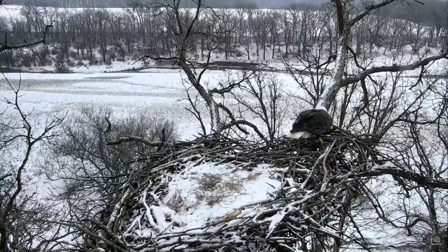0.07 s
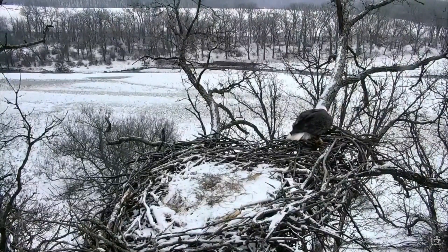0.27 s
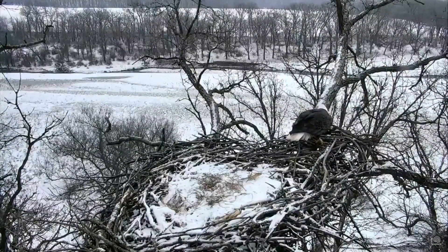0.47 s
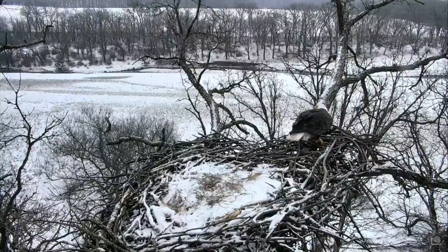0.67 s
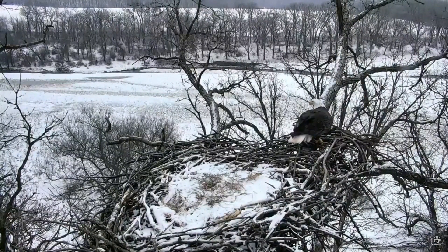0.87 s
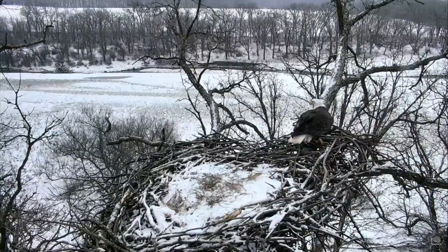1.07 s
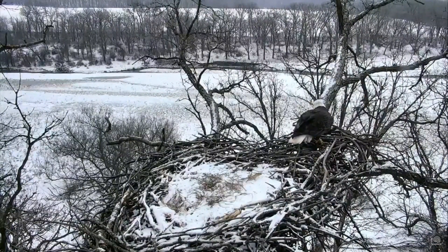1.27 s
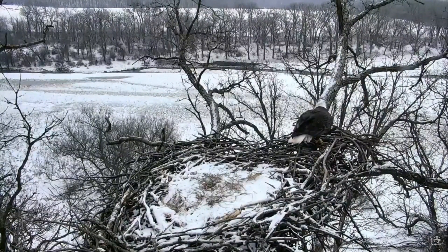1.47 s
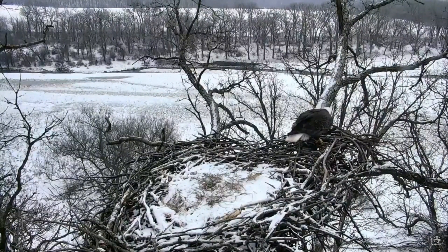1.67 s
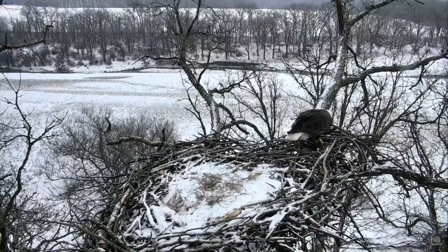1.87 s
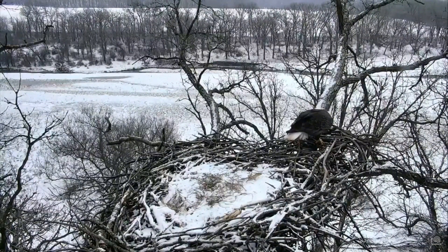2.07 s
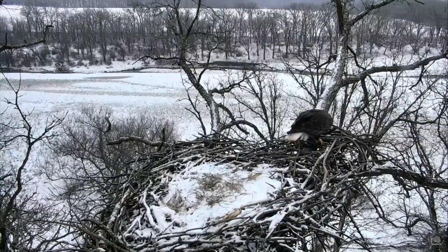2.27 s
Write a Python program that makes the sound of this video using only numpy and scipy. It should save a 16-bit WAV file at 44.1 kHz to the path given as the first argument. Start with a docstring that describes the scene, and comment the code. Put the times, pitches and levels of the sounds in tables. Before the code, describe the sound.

Low microphone hum, far engine drone and airy hiss run throughout in an open winter valley; after about a second a faraway crow caws three times with ringing echoes, then one faint tick close to the microphone.

```python
"""A steady camera hum, the drone of a far engine and outdoor hiss open the scene, in a snowy, wooded valley.
From about 1 s a distant crow caws three times; one faint tick follows at about 2 s.
Air is shaped noise in swelling bands, hum and engine are wavering sines, the tick is decaying noise.
Each caw is a harmonic series on an arch of pitch, raspy at both ends; trees and far slope throw it back."""
import sys
import numpy as np
from scipy import signal
from scipy.fft import rfft, irfft
from scipy.io import wavfile

SR = 44100
rng = np.random.default_rng(int(sys.argv[2]) if len(sys.argv) > 2 else 0)


def put_to_file(sound):
    """Save the sound as 16-bit audio at rate SR, in the file named by the first command-line argument."""
    columns = np.atleast_2d(sound).T  # one column per channel
    safe = np.clip(columns, -1, 1)
    whole_steps = np.round(safe * 32767)
    wavfile.write(sys.argv[1], SR, whole_steps.astype(np.int16))


N = 102929


def amp(db):
    """Decibels to gain."""
    return 10 ** (np.asarray(db) / 20)


def unit(x):
    """Scales to rms 1."""
    return x / np.sqrt(np.mean(x ** 2) + 1e-20)


def read(points, hz):
    """Interpolates a (frequency, value) table on a log-frequency axis."""
    f, value = np.transpose(points)
    return np.interp(np.log(hz + 1), np.log(f + 1), value)


def curves(rows):
    """Interpolates each column of a time table at every sample."""
    s, *columns = np.transpose(rows)
    t = np.arange(N) / SR
    return [np.interp(t, s, column) for column in columns]


def noise(shape):
    """Noise of rms 1, white noise weighted by the amplitude gain shape(Hz)."""
    spectrum = rfft(rng.standard_normal(N))
    return unit(irfft(spectrum * shape(np.fft.rfftfreq(N, 1 / SR)), N))


def wander(rate_hz):
    """Random motion of rms 1, up to about rate_hz."""
    return noise(lambda f: (f > 0) / (1 + (f / rate_hz) ** 2) ** 2)


def add(mix, start_s, sound):
    """Mixes a sound in at start_s, cut at the end of the mix."""
    part = mix[round(start_s * SR):][:len(sound)]
    part += sound[:len(part)]


def tone(hz, db):
    """Sine that follows a pitch and an rms level."""
    turns = np.cumsum(hz * np.ones(N)) / SR
    return np.sqrt(2) * amp(db) * np.sin(2 * np.pi * (turns + rng.random()))


# outdoor air and microphone hiss, relative spectrum: (frequency [Hz], density [dB per Hz])
AIR_SPECTRUM = [(15, -36), (27, -24.5), (40, -17.5), (65, -17.5), (100, -23), (140, -19), (200, -24.5),
                (280, -26), (400, -31.5), (460, -28), (510, -24.5), (570, -31.5), (850, -32), (1200, -36),
                (2000, -39.5), (3000, -46.5), (5000, -49.5), (9000, -53), (15500, -55)]
# band gains: (time [s], rumble [dB], low mids [dB], mids [dB])
AIR_SWELLS = [(0, 11.5, 0.5, -2.5), (.35, -4.5, 0, -1.5), (.65, 4, -4.5, -2), (.82, 7, 0, -1),
              (1.0, 0.5, 3, -2.5), (1.11, 3, 7.5, -6), (1.19, 3, -3.5, 2), (1.4, -4, -3, 3),
              (1.56, 0.5, 4.5, -0.5), (1.8, -1, -4.5, -0.5), (2.1, -5, 0.5, 0), (2.3, 3.5, -1, 1)]
AIR_DB = -56.5  # rms before the swells


def air():
    """Broadband noise: rumble, low mids and mids swell slowly under an even hiss."""
    wash = rfft(amp(AIR_DB) * noise(lambda f: amp(read(AIR_SPECTRUM, f))))
    hz = np.fft.rfftfreq(N, 1 / SR)
    below = [1 / (1 + (hz / edge_hz) ** 4) for edge_hz in (120, 420, 1100)]
    bands = np.diff([0 * hz, *below, 1 + 0 * hz], axis=0)
    gains_db = [*curves(AIR_SWELLS), 0]  # top band stays even
    return sum(amp(db) * irfft(wash * band, N) for db, band in zip(gains_db, bands))


HUM_HZ, HUM_DB, HUM_WAVER_DB = 95.8, -47.5, 1.2  # waver as rms


def hum():
    """The camera's low hum: one sine of fixed pitch, its level wavering slightly."""
    return tone(HUM_HZ, HUM_DB + HUM_WAVER_DB * wander(3))


# firing rate: (time [s], frequency [Hz])
ENGINE_SPEED = [(0, 118.3), (.5, 118.1), (1.0, 118), (1.5, 117.7), (2.0, 117.1), (2.33, 116.8)]
# levels: (time [s], firing tone [dB], octave [dB], gain of weaker tones [dB])
ENGINE_LEVEL = [(0, -50, -71.5, -9), (.28, -50, -61.5, -1), (.46, -52.5, -72, 1.5), (.7, -51.5, -71.5, -4),
                (.88, -58.5, -66, 4.5), (1.05, -78, -69, 5), (1.22, -61, -80, 1.5),
                (1.43, -59.5, -69.5, 4.5), (1.62, -63.5, -66.5, 0), (1.82, -68, -59.5, 2),
                (2.04, -55.5, -58, -13), (2.33, -58, -64.5, -8)]
# weaker tones before the gain: (multiple of firing rate [ratio], level [dB])
ENGINE_TONES = [(1.5, -75.5), (2.55, -72.5), (3, -80.5)]
ENGINE_WAVER_DB, ENGINE_DRIFT = 1, .0054  # weaker tones: rms level waver, rms pitch drift [ratio]


def engine():
    """Far engine: sines at the firing rate, its octave and weaker multiples fade in and out."""
    (hz,) = curves(ENGINE_SPEED)
    firing_db, octave_db, weak_gain_db = curves(ENGINE_LEVEL)
    weak = 0
    for multiple, db in ENGINE_TONES:
        tone_hz = multiple * hz * (1 + ENGINE_DRIFT * wander(6))
        weak = weak + tone(tone_hz, db + weak_gain_db + ENGINE_WAVER_DB * wander(2.5))
    return tone(hz, firing_db) + tone(2 * hz, octave_db) + weak


TICK_S, TICK_DB, TICK_T60_S = 2.046, -62, .014  # level at onset
TICK_HZ, TICK_WIDTH_HZ = 7000, 5000
RUSTLE_DB, RUSTLE_HALF_S = -78, .04  # level at peak; half-width to 1/e


def tick():
    """Bright noise, decaying at once inside a brief rustle, as of a twig shifting near the microphone."""
    out, t = np.zeros(N), np.arange(N) / SR
    grain = noise(lambda f: np.exp(-((f - TICK_HZ) / TICK_WIDTH_HZ) ** 2))
    decay = np.exp(-np.log(1000) * t / TICK_T60_S)
    add(out, TICK_S, grain * amp(TICK_DB) * decay)
    swell = np.exp(-((t - TICK_S) / RUSTLE_HALF_S) ** 2)
    return out + grain * amp(RUSTLE_DB) * swell


def scatter(t60):
    """Response of many trunks: sparse random reflections, each frequency dying in t60(Hz) seconds."""
    taps = rng.choice([-1., 1.], SR) * (rng.random(SR) < 2000 / SR)  # about 2000 in 1 s
    hz, t, z = signal.stft(taps, SR, nperseg=256)
    decay = 1e-3 ** (t / t60(hz)[:, None])
    tail = signal.istft(z * decay, SR, nperseg=256)[1]
    # scaled by the energy in the voice band
    voice_sos = signal.butter(2, [1200, 1800], "band", fs=SR, output="sos")
    voice_band = signal.sosfilt(voice_sos, tail)
    return tail / np.linalg.norm(voice_band) * np.sqrt(1200 / SR)


# ring of the woods: (frequency [Hz], t60 [s])
WOODS_T60 = [(500, 1.5), (1350, 2.2), (1700, 1.6), (2500, 1), (3500, 0.45), (7000, 0.61)]
# dull reflections from nearby trunks and banks: (delay [s], gain [dB])
REFLECTIONS = [(.026, -12), (.043, -15), (.081, -12)]
REFLECTION_EDGE_HZ = 2270
WOODS_DB, NEAR_DB, NEAR_T60_S = -3, -11, .23
SLOPE_DELAY_S, SLOPE_DB = .19, -7.5


def valley(x):
    """Near trees smear the call, the woods ring on, and the far slope sends a blurred, dull echo."""
    near = signal.fftconvolve(x, scatter(lambda hz: NEAR_T60_S + 0 * hz))[:N]
    woods = signal.fftconvolve(x, scatter(lambda hz: read(WOODS_T60, hz)))[:N]
    echo = signal.fftconvolve(x, scatter(lambda hz: read(WOODS_T60, hz) / 2))[:N]
    out = x + amp(NEAR_DB) * near + amp(WOODS_DB) * woods
    dull = signal.butter(3, REFLECTION_EDGE_HZ, fs=SR, output="sos")
    for delay_s, db in REFLECTIONS:
        add(out, delay_s, amp(db) * signal.sosfilt(dull, x))
    add(out, SLOPE_DELAY_S, amp(SLOPE_DB) * signal.sosfilt(dull, echo))
    return out


# throat resonances: (frequency [Hz], gain [dB])
THROAT = [(500, -21), (820, -11.5), (1100, -4), (1420, 2), (1650, -1), (1850, -5.5), (2080, -5),
          (2450, -11), (2850, -15.5), (3270, -6), (3600, -11), (3900, -13.5), (4130, -17.5), (4950, -21),
          (5800, -23.5), (8000, -35)]
# course of a caw, times after the top before stretch: (time from top [s], pitch [share of top],
# effort [dB], gain of harmonic 4, half for 3 [dB], gain of harmonics 5-9 [dB])
CAW_SHAPE = [(-.058, .73, -12, -3, -6), (-.036, .88, -6, -5, -8), (-.026, .935, 1, -7, -8),
             (-.015, .98, 0, -2.5, -4), (0, 1, -2, 2, 0), (.017, .99, 0, -4, -1),
             (.033, .955, -.5, -11, -3), (.048, .87, 0, -11, -8), (.063, .82, 1, -18, -13),
             (.092, .66, 1, -22, -20)]
ROUGH_TOP, ROUGH_ENDS = .17, .8  # depth of flutter
ROUGH_DROP = .23  # fully rough once the pitch is this share below the top
RASP_HZ, JITTER = 120, .006  # pitch jitter as a share, before roughness widens it
EDGE_S = .01


def caw(top_s, top_hz, db, stretch):
    """Harmonics arch up and down through a fixed throat: clear on top, raspy where the pitch is low."""
    s, *columns = np.transpose(CAW_SHAPE)
    s = np.where(s > 0, s * stretch, s)
    t = np.arange(s[0], s[-1], 1 / SR)
    pitch, effort_db, middle_db, highest_db = (np.interp(t, s, c) for c in columns)
    hz = top_hz * pitch
    drop = np.clip((1 - pitch) / ROUGH_DROP, 0, 1)
    rough = ROUGH_TOP + (ROUGH_ENDS - ROUGH_TOP) * drop
    jitter = JITTER * (1 + 2 * rough) * wander(RASP_HZ * 2)[:len(t)]
    turns = np.cumsum(hz * (1 + jitter)) / SR
    rasp = noise(lambda f: np.exp(-(2 * (f / RASP_HZ - 1)) ** 2))[:len(t)]
    voice = 0
    for k in range(1, 10):
        # rasp shared by all harmonics, plus motion of its own
        flutter = 1 + rough * (rasp + wander(RASP_HZ * 2)[:len(t)]) / np.sqrt(2)
        bright_db = highest_db if k > 4 else middle_db * max(k / 2 - 1, 0)
        level = amp(read(THROAT, k * hz) + bright_db)
        voice = voice + level * flutter * np.cos(2 * np.pi * (k * turns + rng.random()))
    edges = np.clip(np.minimum(t - t[0], t[-1] - t) / EDGE_S, 0, 1)
    start_s = top_s + t[0]
    return start_s, amp(db + effort_db) * edges * voice / np.sqrt(1 + rough ** 2)


# caws: (time of pitch top [s], top pitch [Hz], gain before effort and throat [dB], stretch of fall [ratio])
CAWS = [(1.043, 823, -53.6, 1.08), (1.364, 823, -54, .96), (1.722, 823, -54.2, .98)]


def crow():
    """Three caws carried across the valley."""
    calls = np.zeros(N)
    for row in CAWS:
        add(calls, *caw(*row))
    return valley(calls)


def scene():
    """All sources summed at one microphone."""
    return (air() + hum() + engine() + tick() + crow())[None]


BAND_EDGE_HZ = 15550


def record(dry):
    """Band limit: a steep linear-phase low-pass."""
    lowpass = signal.firwin(511, BAND_EDGE_HZ, window=("kaiser", 9), fs=SR)
    return signal.oaconvolve(dry, lowpass[None], "same")


dry = scene()
out = record(dry)
put_to_file(out)
```